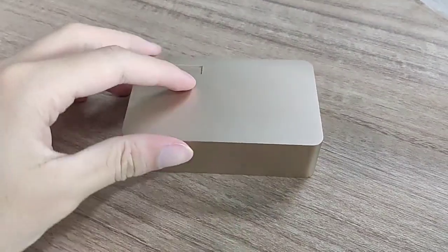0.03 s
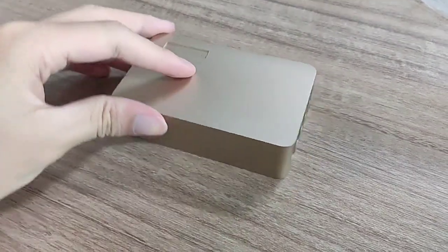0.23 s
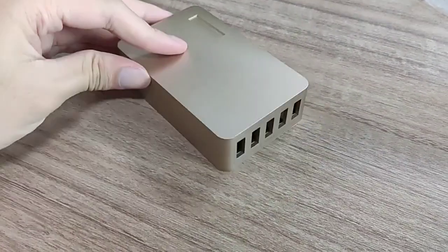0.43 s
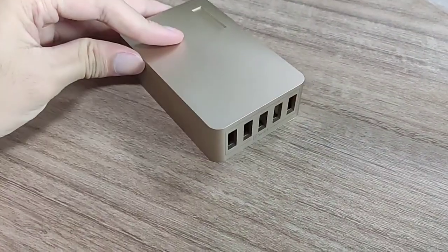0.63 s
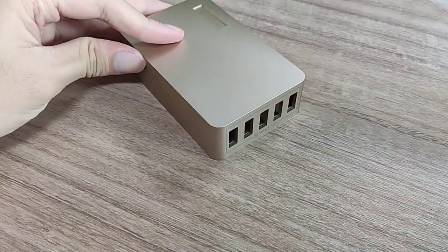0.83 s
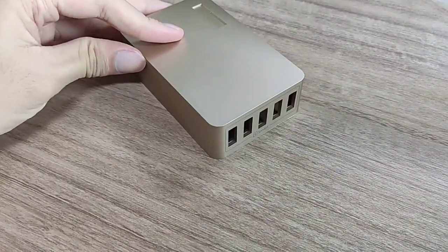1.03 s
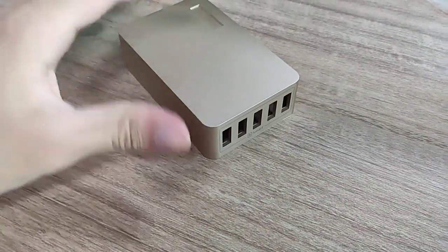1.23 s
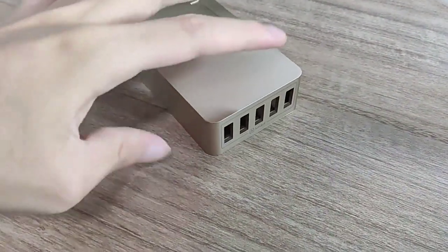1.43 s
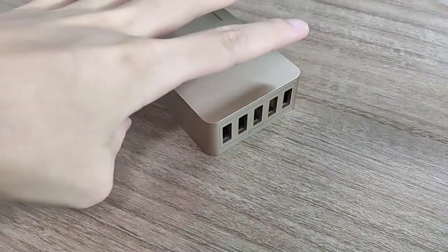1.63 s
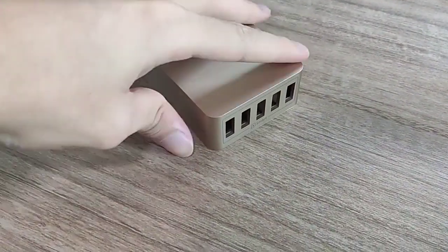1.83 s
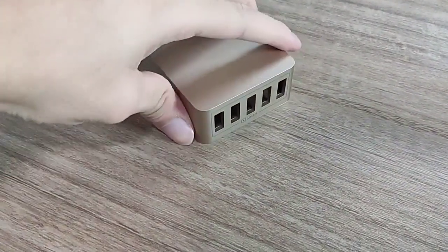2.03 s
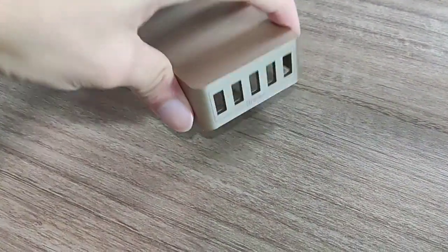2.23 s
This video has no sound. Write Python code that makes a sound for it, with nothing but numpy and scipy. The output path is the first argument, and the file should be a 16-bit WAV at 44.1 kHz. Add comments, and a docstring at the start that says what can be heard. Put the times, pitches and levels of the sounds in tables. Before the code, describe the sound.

A hollow plastic shell scrapes round on a wooden table, then is gripped and lifted.

```python
"""Over a faint room hush, a hollow plastic shell scrapes round on a wooden tabletop, turned by hand.
Its underside judders over the grain and sets shell and table ringing; the thumb nudges it as it lets go.
Then skin brushes the plastic, the shell slips and knocks as it is gripped, and its edge scuffs as it
is lifted. A small, live room, heard in stereo from close to the table."""
import sys
import numpy as np
from scipy import signal
from scipy.fft import rfft, irfft
from scipy.io import wavfile
from scipy.ndimage import uniform_filter1d

SR = 44100
rng = np.random.default_rng(int(sys.argv[2]) if len(sys.argv) > 2 else 0)


def transcribe(signal):
    """Save signal, clipped to [-1, 1], as a 16-bit WAV file at the path in sys.argv[1]."""
    frames = np.atleast_2d(signal).T
    limited = np.clip(frames, -1, 1)
    pcm = np.round(limited * 32767).astype(np.int16)
    wavfile.write(sys.argv[1], SR, pcm)


N = 105840
T = np.arange(N) / SR
HZ = np.maximum(np.arange(N // 2 + 1) * SR / N, 1)


def from_db(db):
    """Decibels to gain."""
    return 10 ** (np.asarray(db) / 20)


def rms_one(x):
    """Scale to unit rms."""
    return x / np.sqrt(np.mean(x ** 2) + 1e-20)


def at_hz(points, hz=HZ):
    """Read a table on a log-frequency axis."""
    freqs, values = np.transpose(points)
    return np.interp(np.log(hz), np.log(freqs), values)


def level(curve):
    """Gain along a curve of time_s, level_db; silent outside it."""
    return from_db(np.interp(T, *np.transpose(curve), left=-np.inf, right=-np.inf))


def decay(t60_s):
    """A fade that falls 60 dB in t60_s."""
    return np.exp(-np.log(1000) * T / t60_s)


def pan(db):
    """Gains that put the left channel db above the right."""
    return from_db(np.array([[.5], [-.5]]) * db)


def white():
    """Two unrelated white noises."""
    return rng.standard_normal((2, N))


def stereo(pair, likeness):
    """Mix two unrelated signals as mid and side; likeness 1 is mono."""
    mid, side = pair
    return np.sqrt(1 + likeness) * mid + np.sqrt(1 - likeness) * side * np.array([[1], [-1]])


def coloured(pair, spectrum, likeness, pan_db=0):
    """Stereo noise shaped by a spectrum, rms 1."""
    return rms_one(irfft(stereo(rfft(pair), likeness) * from_db(at_hz(spectrum)) * pan(pan_db), N))


# Spectra of the steady room tone and of the ring hanging in the room: freq_hz, relative_db
ROOM_TONE = [(25, -6), (90, -2.5), (170, -2), (290, -6), (510, -10), (620, -18), (900, -18.5),
             (1500, -24.5), (2700, -27), (4200, -37.5), (6600, -35.5), (7600, -43), (15000, -43)]
LINGER = [(300, -38), (700, 0.5), (950, 7.5), (1400, 1), (2500, -8.5), (4000, -21.5), (10000, -32.5)]
# How alike room tone and reverberation are at the two microphones: freq_hz, likeness
TONE_LIKENESS = [(50, 0.98), (300, 0.89), (900, 0.17), (2500, 0.05), (15000, 0.024)]
REVERB_LIKENESS = [(200, 1), (900, 0.26), (2000, 0.31), (15000, 0)]


def room_tone():
    """Low steady noise; at the start the room is still ringing faintly."""
    linger = from_db(-43) * decay(t60_s=1) * coloured(white(), LINGER, at_hz(REVERB_LIKENESS))
    return linger + from_db(-46) * coloured(white(), ROOM_TONE, at_hz(TONE_LIKENESS))


def grains(per_s=2500, spread_db=1, flutter_db=0, flutter_hz=23.3):
    """Friction as two streams of tiny contacts of uneven size; steady while flutter_db is 0."""
    lowpass = signal.butter(2, flutter_hz, fs=SR, output="sos")
    flutter = rms_one(signal.sosfilt(lowpass, rng.standard_normal(N)))
    sizes = from_db(spread_db * np.minimum(rng.exponential(1, (2, N)), 4) + flutter_db * flutter)
    contacts = rng.random((2, N)) < per_s / SR
    return contacts * sizes * rng.choice([-1, 1], (2, N))


# Where the scratch sits between the microphones: freq_hz, left_over_right_db
GRIT_PAN = [(1000, 3), (2400, -5), (4000, -2), (6800, -5.5), (10000, -0.5), (15000, 5)]


def grit(spectrum):
    """Dry scratch: tiny contacts ring the dense, short-lived high modes of the plastic."""
    plastic_ring = white() * decay(t60_s=.035)
    scratch = signal.fftconvolve(grains(), plastic_ring, axes=1)[:, :N]
    return coloured(scratch, spectrum, likeness=0.15, pan_db=at_hz(GRIT_PAN))


def shell(force, modes):
    """Resonances that swell over a few cycles, each reaching the two microphones in its own way."""
    sound = 0
    for k, (pitch_hz, width_hz, level_db, side_db, lag_ms) in enumerate(modes):
        radius = np.exp(-np.pi * width_hz / SR)
        gain = (1 - radius ** 2) / 2
        resonator = [gain, 0, -gain, 1, -2 * radius * np.cos(2 * np.pi * pitch_hz / SR), radius ** 2]
        right = signal.sosfilt([resonator, resonator], force + 1e-18)
        left = np.interp(T - lag_ms / 1000, T, right)
        sound = sound + (-1) ** k * from_db(level_db) * pan(side_db) * np.array([left, right])
    return sound


def rubbed(modes):
    """The shell kept ringing by friction, its slow swings evened out; rms 1."""
    ring = shell(grains()[0], modes)
    power = uniform_filter1d(np.mean(ring ** 2, axis=0), size=600)
    return ring / np.sqrt(power + 1e-14)


# Course of the turn's ring and of its gritty treble, close up: time_s, level_db
TURN_RING_LEVEL = [(.104, -47), (.118, -29), (.19, -32.5), (.225, -27.5), (.28, -27.5), (.33, -22.5),
                   (.385, -18.5), (.425, -20.5), (.445, -25), (.47, -23), (.52, -24.5), (.57, -36),
                   (.62, -56), (.665, -33), (.71, -51), (.76, -99)]
TURN_GRIT_LEVEL = [(.09, -70), (.115, -52.5), (.19, -50), (.23, -45.5), (.32, -45.5), (.36, -39.5),
                   (.385, -35), (.42, -36), (.44, -40), (.475, -38.5), (.55, -47.5), (.62, -51.5),
                   (.678, -49), (.71, -69)]
# Spectrum of that grit: freq_hz, relative_db
TURN_GRIT_SPECTRUM = [(300, -3), (1200, -7), (1800, 5), (2050, 14), (2500, 16.5), (3100, 10), (3900, 12),
                      (5000, 8), (6900, 5.5), (9200, 0), (15000, -6.5)]
# Modes of the shell resting on the table, and of its thin walls:
# pitch_hz, width_hz, relative_db, left_over_right_db, left_lag_ms
RESTING_MODES = [(299.5, 67, -22, -5, 0.02), (419.7, 65, -14, -1, 0.16), (526, 70, -17, -3.5, 0.097),
                 (744, 113, -9, 2.5, 0.22), (834.3, 58, -6, 1.5, 0.059), (906.5, 74.3, 2.5, 1.5, 0.11),
                 (1001, 203, -6.5, 2.5, 0.17), (1391.3, 91.7, -7, 7, 0), (1459, 37, -3, 3.5, 1),
                 (1770, 280, -23, 0, 0.14)]
WALL_MODES = [(2328, 157, -1, 4.5, 0.022), (2525, 69, -7.5, -10, 0), (2826, 180, -11, 8, 0),
              (3200, 110, -15, -4, 0.068), (3630, 170, -19, 5, 0.046), (3930, 120, -13, 5, 0.045),
              (4095, 130, -16, -13, 0.043), (6800, 170, -16, -3, 0.054)]


def turn(rasp_over_grit_db=6, rasp_growth=2.3):
    """The long scrape; where the shell swings fastest it turns gritty and its walls rasp."""
    ring = level(TURN_RING_LEVEL) * rubbed(RESTING_MODES)
    force = level(TURN_GRIT_LEVEL)
    scratch = force * grit(TURN_GRIT_SPECTRUM)
    rasp_peak = from_db(rasp_over_grit_db) * force.max()
    rasp = rasp_peak * (force / force.max()) ** rasp_growth * rubbed(WALL_MODES)
    return ring + scratch + rasp


# Decay of the small room: freq_hz, t60_s
REVERB_DECAY = [(200, 1), (900, 1), (2500, 1), (6000, 0.78), (14000, 1)]
# Its strength at the microphones: freq_hz, re_direct_db
REVERB_LEVEL = [(200, -6.5), (900, -8), (2500, -4), (6000, -5.5), (14000, -11)]
# Its lean to one side: freq_hz, left_over_right_db
REVERB_PAN = [(300, 2.5), (900, -1), (2500, -5), (8000, -4.5)]


def reverb(direct, build_s=0.0055):
    """The room answers with a diffuse tail, its level and decay set octave by octave."""
    noise = stereo(rfft(white()), at_hz(REVERB_LIKENESS)) / np.sqrt(2)
    tail = 0
    for hz in np.geomspace(125, 16000, 8):
        octave = irfft(noise * np.maximum(1 - np.abs(np.log2(HZ / hz)), 0), N)
        fade = decay(at_hz(REVERB_DECAY, hz)) * (1 - np.exp(-T / build_s))
        gain = from_db(at_hz(REVERB_LEVEL, hz)) * pan(at_hz(REVERB_PAN, hz))
        tail = tail + gain * octave * fade / np.linalg.norm(fade)
    return signal.fftconvolve(direct.mean(axis=0)[None], tail, axes=1)[:, :N]


# The shell catches on the grain or knocks on the table: start_s, peak_db
KNOCKS = [(.113, -21), (.132, -17), (.176, -23), (.199, -17), (.21, -18), (.223, -19), (.233, -18),
          (.254, -15), (.284, -20), (.294, -19), (.314, -17), (.347, -15), (.363, -10), (.384, -8),
          (.398, -11), (.413, -8), (.427, -9), (.459, -13), (.469, -16), (.492, -16), (.506, -15),
          (1.195, -30), (1.943, -27), (1.952, -26), (1.984, -23), (2.06, -28), (2.114, -29), (2.125, -26),
          (2.178, -34)]


def knocks(widening=1.204):
    """Dull blows on the resting shell; the hard contact widens its resonances."""
    force = np.zeros(N)
    for start_s, peak_db in KNOCKS:
        force[int(start_s * SR)] += from_db(peak_db)
    modes = [(hz, width_hz * widening, *rest) for hz, width_hz, *rest in RESTING_MODES]
    unit_peak = np.abs(shell(signal.unit_impulse(N), modes)).max()
    return shell(force, modes) / unit_peak


def strokes(rows, attack_s=.004, release_s=.008):
    """Two envelopes, body and treble, that rise, hold and fall with each short stroke."""
    body, treble = np.zeros((2, N))
    for start_s, length_s, body_db, treble_db in rows:
        rise = np.clip((T - start_s) / attack_s + 1, 0, 1)
        fall = np.exp(-np.maximum(T - start_s - length_s, 0) / release_s)
        body += from_db(body_db) * rise * fall
        treble += from_db(treble_db) * rise * fall
    return body, treble


# Skin brushes the plastic: start_s, length_s, rustle_db, hiss_db
BRUSHES = [(1.135, 0.031, -52, -62), (1.745, 0.033, -66, -59), (1.791, 0.0038, -47, -68),
           (1.81, 0.051, -58, -64), (1.863, 0.0083, -47.5, -52.5), (1.885, 0.1, -53, -58),
           (2.0, 0.22, -59, -72), (2.22, 0.125, -63, -61.5)]
# Spectra of the rustle and the hiss: freq_hz, relative_db
SKIN_RUSTLE = [(100, -10), (350, 3), (850, 8), (1500, -10), (3000, -14.5), (8000, -22)]
SKIN_HISS = [(300, -5), (1500, 2), (4000, -1.5), (7500, 0), (9500, -10), (12000, -7), (13000, 5),
             (15500, -8)]


def fingers():
    """Skin on smooth plastic: a soft rustle and a very high hiss."""
    rustle_gain, hiss_gain = strokes(BRUSHES)
    rustle = rustle_gain * coloured(grains(), SKIN_RUSTLE, likeness=0.45)
    return rustle + hiss_gain * coloured(white(), SKIN_HISS, likeness=0.067)


# Short slips on the tabletop: start_s, length_s, ring_db, grit_db
SLIPS = [(1.165, 0.023, -49, -59), (1.195, 0.03, -40.5, -55), (1.944, 0.047, -30, -43),
         (2.033, 0.03, -42, -52), (2.061, .02, -40.5, -47.5), (2.112, 0.024, -37, -49.5),
         (2.176, 0.016, -41.5, -51)]
# Shell damped by the fingers: pitch_hz, width_hz, relative_db, left_over_right_db, left_lag_ms
GRIPPED_MODES = [(402, 30, -6, -3, 0.056), (572, 88, -9.5, -1, 0.011), (758, 80, -2, 2, .1),
                 (910, 197, 2.5, 3, 0.21), (1035, 104, -7.5, -6, .15), (1380, 255, -10.5, 8, 0.047),
                 (1830, 160, -23, 2, 0.2)]
# Spectrum of the grit in slips and scuffs: freq_hz, relative_db
SLIP_GRIT_SPECTRUM = [(300, 7.5), (1700, 5), (2000, -4), (2450, 10.5), (3200, -3.5), (4100, 3.5),
                      (4900, -10), (5800, 0.5), (7100, -1.5), (9200, -11), (15000, -17)]


def slips():
    """The shell slides a little under the fingers, ringing and scratching on the wood."""
    ring_gain, grit_gain = strokes(SLIPS)
    return ring_gain * rubbed(GRIPPED_MODES) + grit_gain * grit(SLIP_GRIT_SPECTRUM)


# Scuffs of the edge on the tabletop: start_s, length_s, ring_db, grit_db
SCUFFS = [(2.062, 0.0072, -40.5, -70), (2.215, 0.028, -64, -61.5), (2.248, 0.0079, -42, -66),
          (2.311, .013, -34.5, -53.5), (2.327, 0.0039, -35, -54), (2.336, 0.014, -38.5, -50),
          (2.36, 0.028, -71, -57)]
# Shell tilted on its edge: pitch_hz, width_hz, relative_db, left_over_right_db, left_lag_ms
TILTED_MODES = [(463, 105, 0.5, -3, 0.015), (560, 72, -16, -11, 0), (730, 350, -7, 8, 0.11),
                (890, 110, -4, -14, 0.089), (1036, 240, 0, 5, 0.2), (1331, 110, 3.5, 14.5, 0),
                (1840, 120, -9.5, -8, 0.055)]


def scuffs():
    """The edge rubs the wood as the shell tilts and leaves the table."""
    ring_gain, grit_gain = strokes(SCUFFS)
    return ring_gain * rubbed(TILTED_MODES) + grit_gain * grit(SLIP_GRIT_SPECTRUM)


def scene(grip_send_db=0.5):
    """The turn and then the grip, close up, with the room behind them."""
    turning = turn() + knocks()
    gripping = slips() + scuffs() + fingers()
    reflections = reverb(turning + from_db(grip_send_db) * gripping)
    return turning + gripping + reflections + room_tone()


def record(dry, cutoff_hz=15300):
    """The microphone signal, its top cut steeply."""
    return signal.sosfilt(signal.ellip(10, .2, 80, cutoff_hz, fs=SR, output="sos"), dry)


dry = scene()
out = record(dry)
transcribe(out)
```